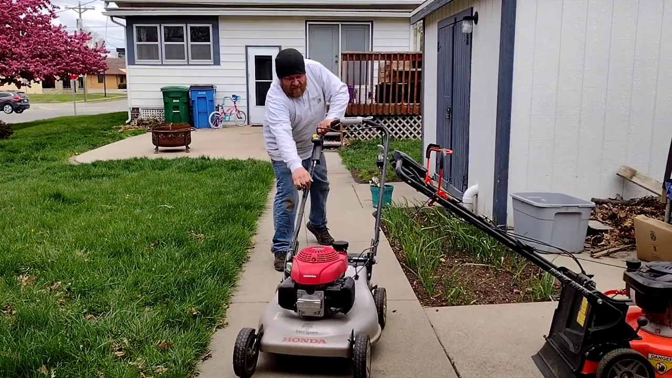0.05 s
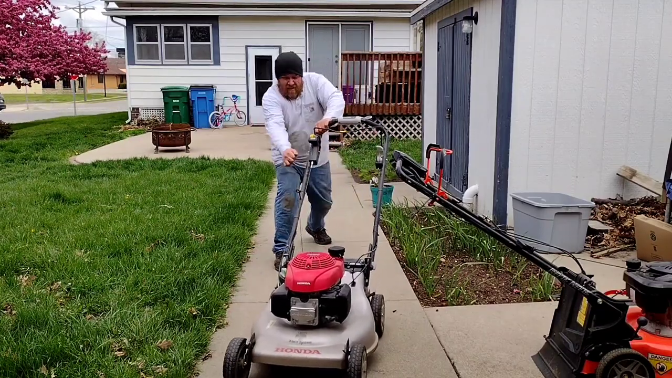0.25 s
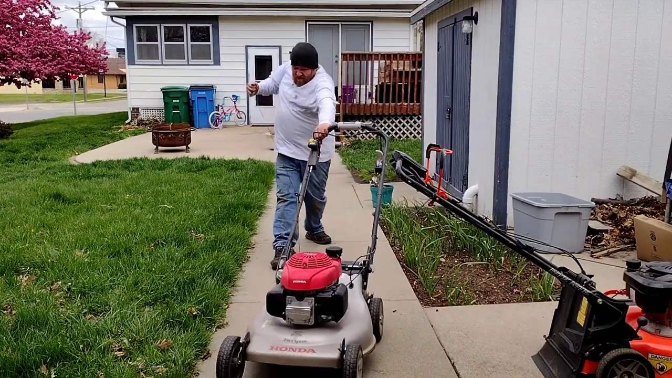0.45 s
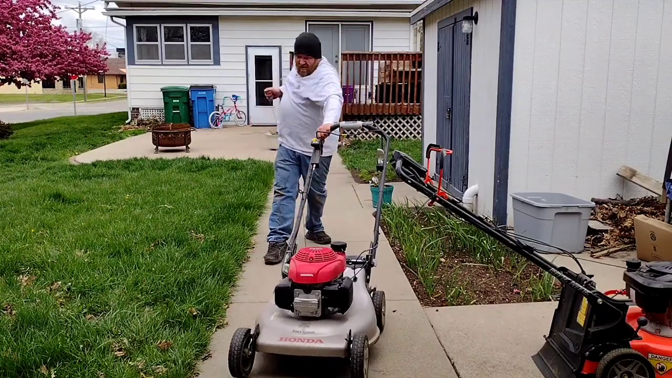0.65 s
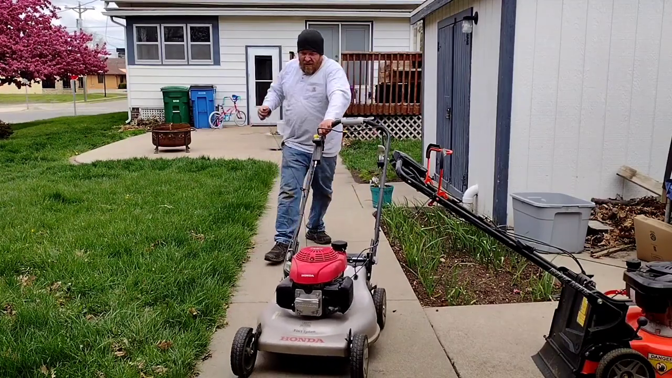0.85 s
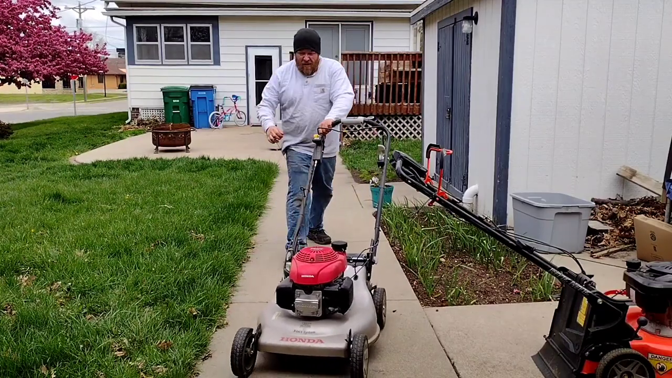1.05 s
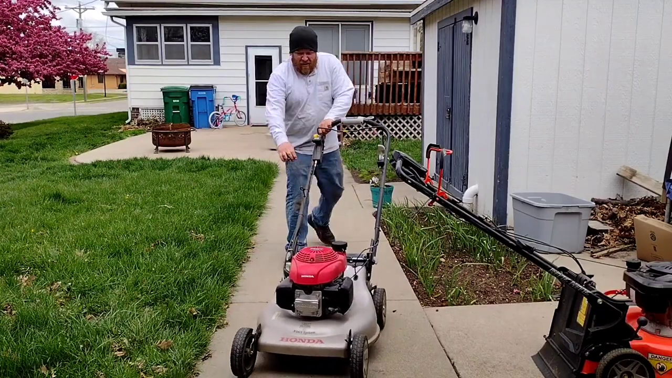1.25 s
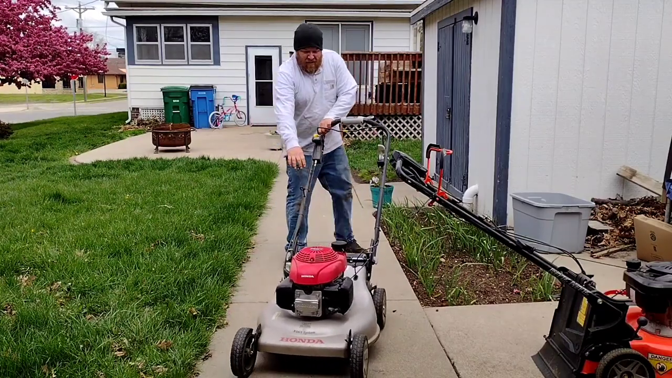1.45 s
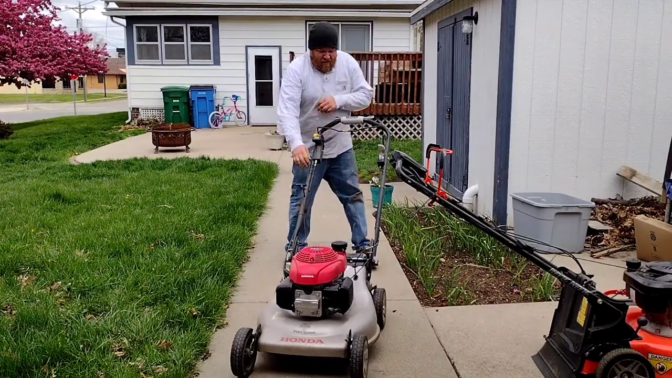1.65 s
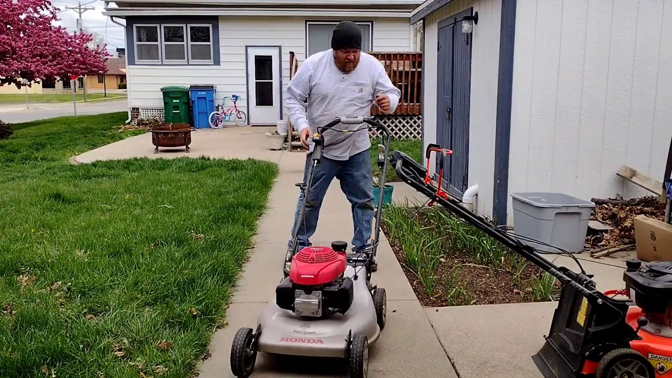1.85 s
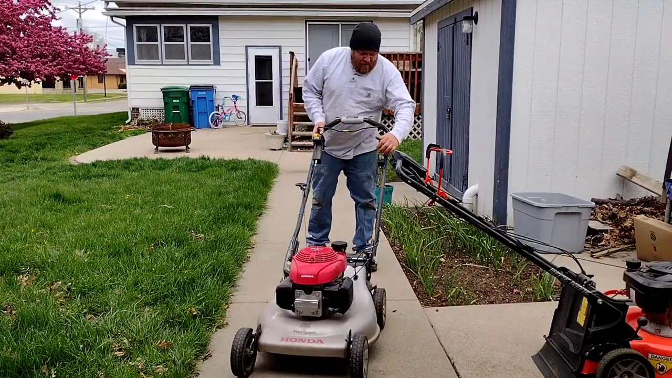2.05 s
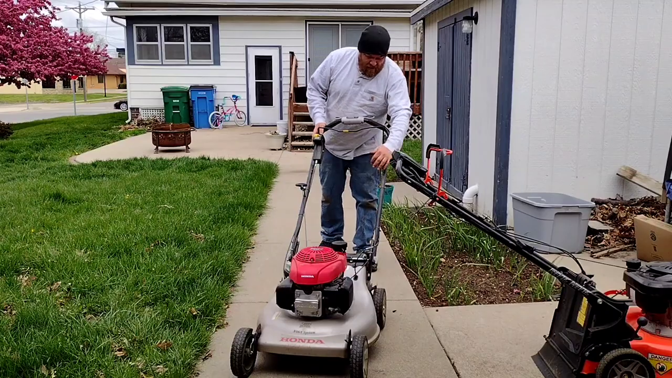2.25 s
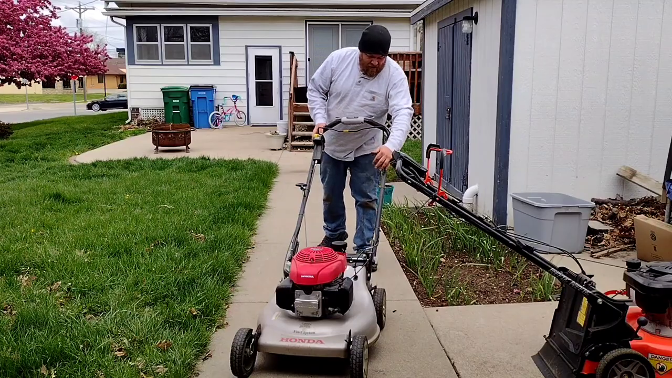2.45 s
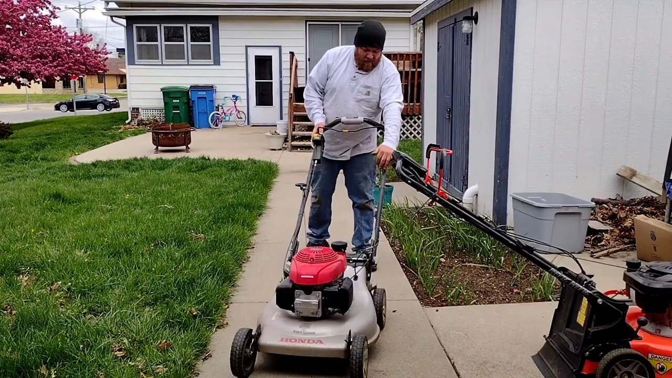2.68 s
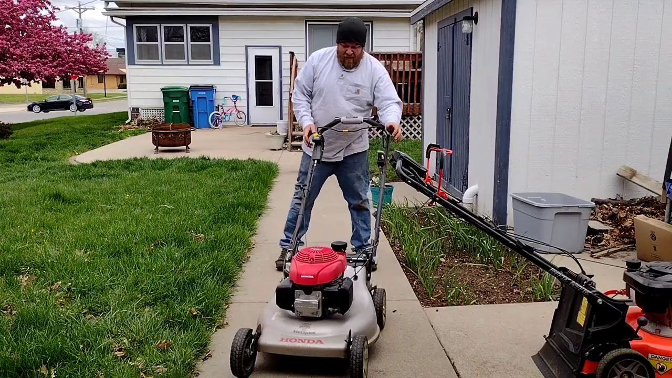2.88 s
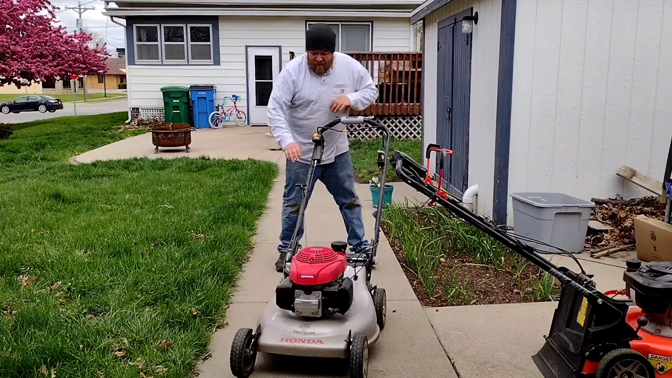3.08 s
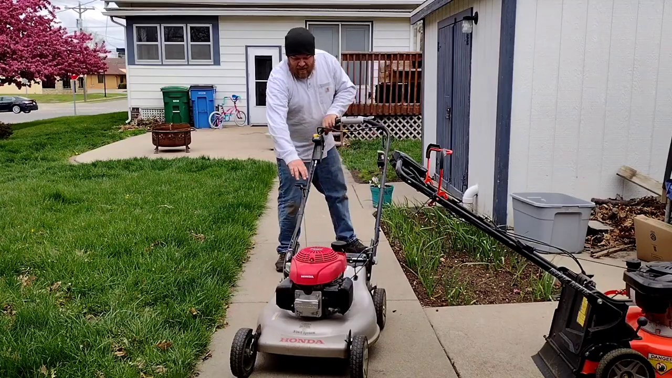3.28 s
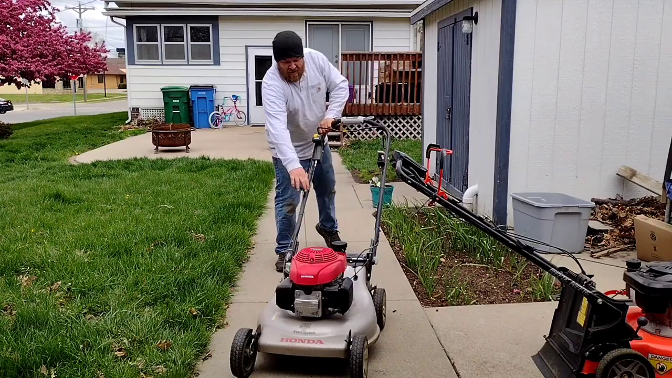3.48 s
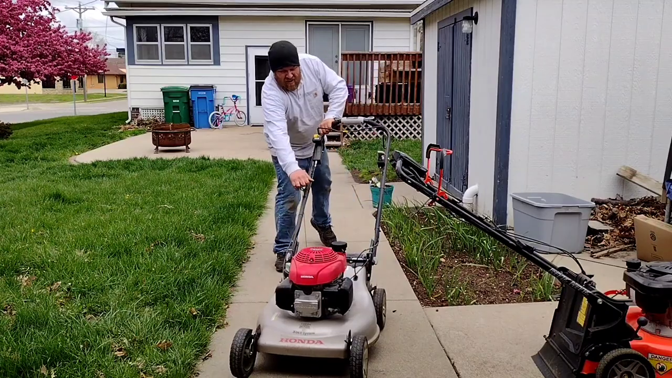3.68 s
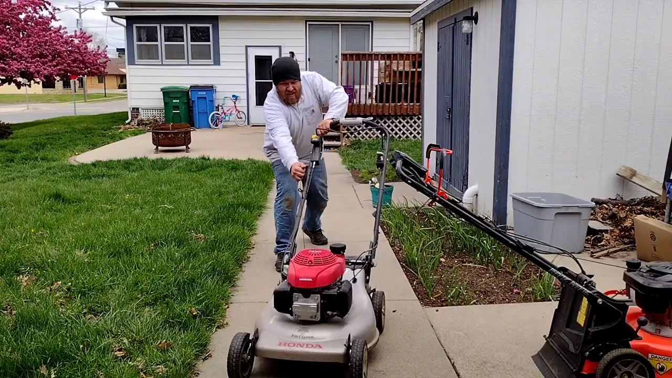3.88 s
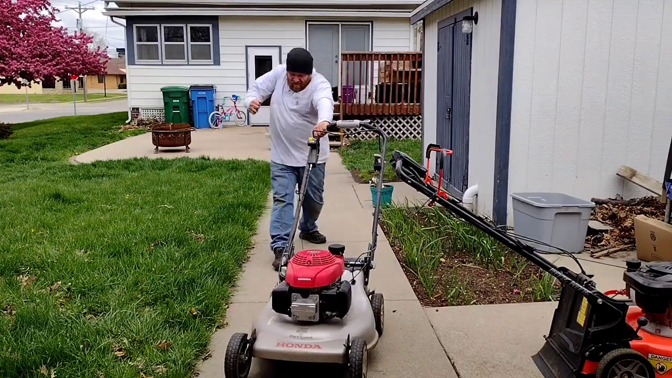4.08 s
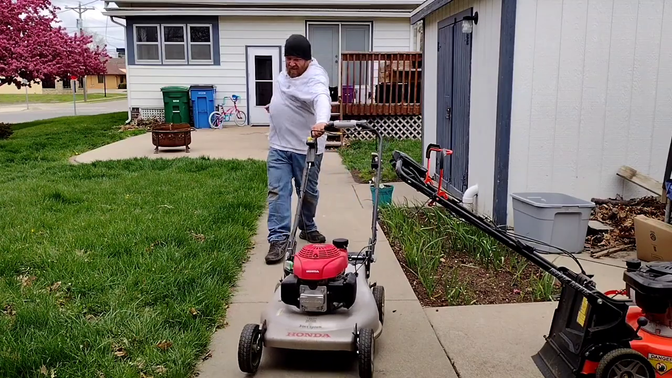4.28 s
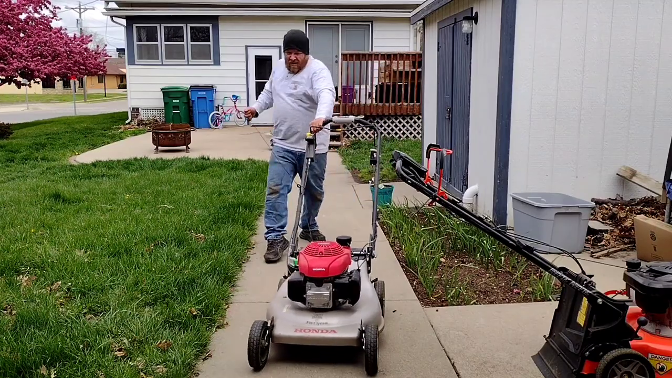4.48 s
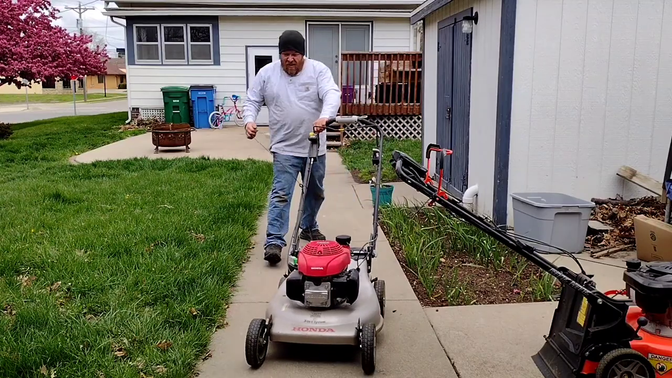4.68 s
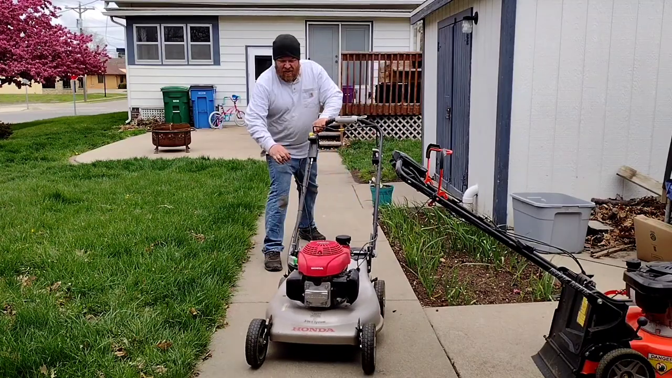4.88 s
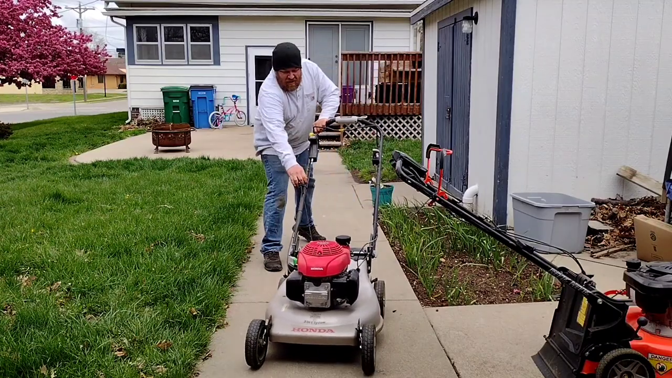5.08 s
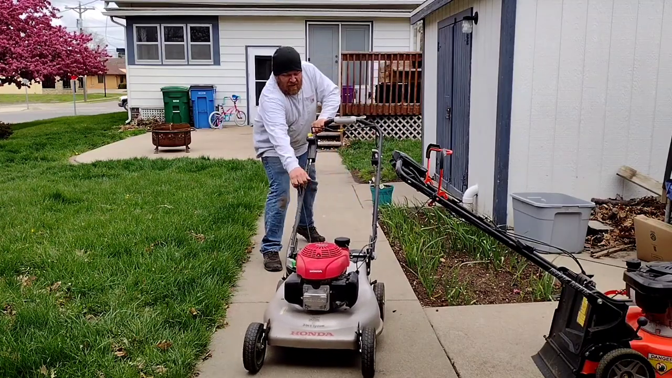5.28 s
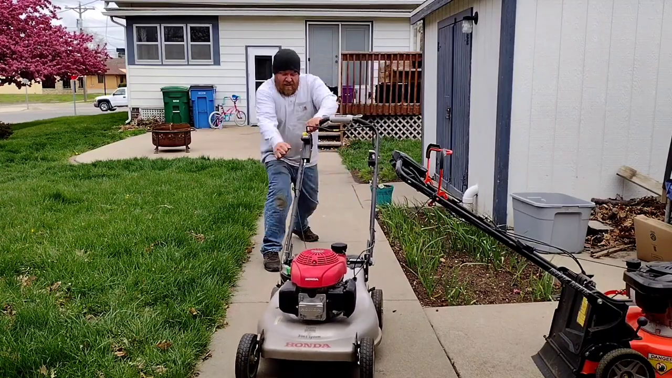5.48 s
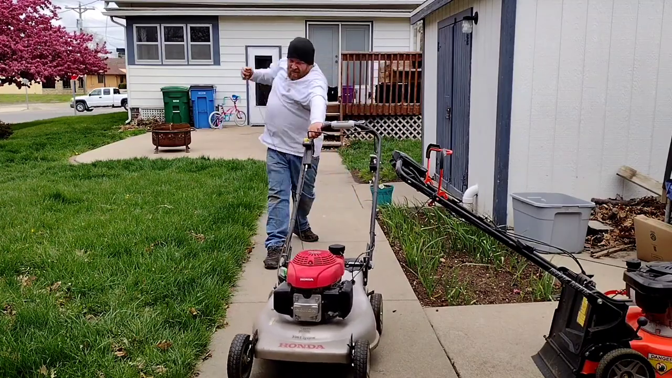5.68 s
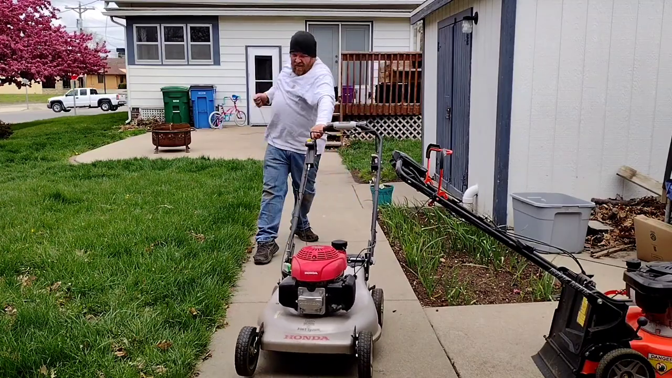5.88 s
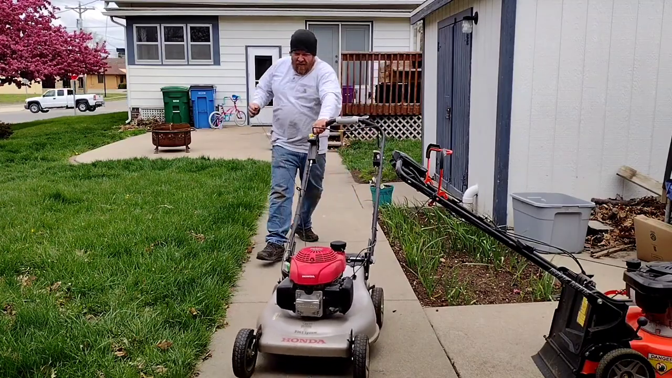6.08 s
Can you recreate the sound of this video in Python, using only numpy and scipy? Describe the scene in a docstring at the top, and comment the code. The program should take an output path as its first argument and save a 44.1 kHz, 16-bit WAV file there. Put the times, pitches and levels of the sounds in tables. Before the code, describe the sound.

A small push mower is heard close up on a concrete path outdoors, with short wall reflections and very faint distant traffic. A handle knock and light ticks open the scene. At 0.25 seconds the starter catches with a metallic clack; the cord zips up in a raspy whine until about 0.57, and the engine chuffs and rattles, booming through the steel deck. Heavy compression thumps at 0.64, 0.83 and 1.13 slow and fade. A bright handle-bar clank rings at 1.6, then it is nearly quiet, with small touches and a faint knock at 2.3. The second pull comes at 3.97, its cord running out near 4.26, with hard knocks at 4.46, 4.68 and 4.78 before coasting down. A tiny squeak and handle knocks come around 5.1 to 5.2. The third pull at 5.48 whines until 5.79 and clatters loudly, still turning at the end, around 6.1 seconds.

```python
"""A push mower on a concrete path is pull-started three times: its engine chuffs over and shakes the steel deck.
Deck, block and bare metal are noise from random impacts, filtered by resonances; valves and pawls clack.
After the first two pulls the engine coasts down; the third is still turning at the end.
The cord whines off its reel as a swept sine, and knocks ring the handle bar as impact noise and damped modes.
Shaped noise gives far traffic; walls return a diffuse echo of the mower."""
import sys
import numpy as np
from scipy import signal
from scipy.fft import rfft, irfft, next_fast_len
from scipy.io import wavfile

SR = 44100
rng = np.random.default_rng(int(sys.argv[2]) if len(sys.argv) > 2 else 0)


def digitize_waveform(pressure):
    """Quantize a signal to 16-bit integers and store it at the path in sys.argv[1].

    Rows of a 2-D input are taken as channels; values are limited to [-1, 1].
    """
    field = np.atleast_2d(pressure).T
    bounded = np.clip(field, -1, 1)
    quanta = np.round(bounded * 32767).astype(np.int16)
    wavfile.write(sys.argv[1], SR, quanta)


N = 270333

# Far road noise. Each row: frequency in Hz, relative spectrum level in dB.
TRAFFIC_SPECTRUM = [(15, -72), (25, -29.5), (97, -7.5), (259, -20), (330, -25), (368, -23), (568, -22),
                    (651, -23), (1120, -26.5), (1430, -30.5), (1880, -33), (15200, -59), (16500, -62)]
# Correlation of the road noise between the ports. Each row: frequency in Hz, left-right likeness from 0, unrelated,
# to 1, the same; lower values count as 0.
TRAFFIC_LIKENESS = [(60, 0.94), (240, 0.91), (950, 0.18), (3770, -0.21), (15000, -0.43)]
TRAFFIC_DB = -59

# Spectral lean of the mower to one side. Each row: frequency in Hz, left minus right in dB.
LEAN = [(60, 0), (180, -1.0), (550, 0), (1650, -0.5), (4970, 4.5), (15000, 1.5)]
# Echo of shed, house and concrete. Each row: band centre in Hz, level before the band filter in dB, t60 in seconds.
ECHO_BANDS = [(58.1, -28, .3), (520, -20.5, 1), (1967, -2.5, 0.2), (7960, -11.5, 0.25)]
LEFT_LEAD_S = .000018

# Knocks on the handle bar. Each row: start in seconds, tube, rod and cable clip levels in dB, rattle t60 in seconds.
BAR_KNOCKS = [(.010, -46, -44, -62, 0.076), (0.253, -43, -46, -43, 0.52), (1.577, -60, -53.5, -55.5, 0.27),
              (1.599, -36.5, -35.5, -35, 0.4), (2.311, -68.5, -61, -56, 0.066),
              (3.974, -43.5, -63, -44.5, 0.57), (5.194, -43, -44, -62, 0.13), (5.226, -41, -49, -63, 0.26),
              (5.483, -44, -34.5, -39, 0.047)]
# Resonances of the bar's tube. Each row: frequency in Hz, width in Hz, relative level in dB.
TUBE_MODES = [(195.2, 17, -6.5), (311.3, 40, -10), (417, 37, -3)]
# Resonances of the bar's rod. Each row: frequency in Hz, width in Hz, relative level in dB.
ROD_MODES = [(1890, 120, -5), (2400, 54, 3), (2506, 150, 0), (2707, 44, 6.5), (2940, 25, -3.5),
             (2910, 40, -6), (3360, 150, -16.5)]
# Resonances of the cable clip. Each row: frequency in Hz, width in Hz, relative level in dB.
CLIP_MODES = [(4450, 250, -1), (4700, 250, 0), (5050, 300, -1), (5400, 300, -1), (5750, 300, -2),
              (7200, 400, -13)]
# Tube, rod and clip struck clean. Each row: frequency in Hz, level against that part's knock in dB, t60 in seconds.
BAR_RING = [(417, 11, 0.28), (2900, 9, .11), (4740, 16, 0.055)]
BAR_RISE_S = .007
SNAP_DB, SNAP_T60_S = 11.5, .06  # a bar knock snaps this far above its clip level

# Starter pulls. Each row: pawls catch in seconds, its nominal peak in dB, its t60 in seconds,
# cord starts to whine in seconds, reel spin-up time in seconds, cord runs out in seconds,
# its nominal peak in dB, its t60 in seconds.
PULLS = [(0.2545, -14, .016, .335, .08, .5726, -6.5, 0.039),
         (3.9742, -18.5, 0.054, 4.045, .062, 4.2625, -10, 0.057),
         (5.4836, -12.5, 0.035, 5.575, 0.063, 5.7855, -7, 0.051)]
# A thin squeak. The row: middle in seconds, half length in seconds (sign immaterial), top in Hz, foot in Hz,
# level in dB.
SQUEAK = (5.088, -0.06, 10099, 6500.5, -70)
WHINE_FROM_HZ, WHINE_TOP_HZ, WHINE_BEND = 2500, 5350, 1.2
WHINE_DB, WHINE_FADE_S = -44.5, .02

# Mower turning over: a table for each pull, and the second for it being only shifted about.
# Each row: time in seconds, deck shake in dB, rasp in dB, air hiss in dB.
SHAKING = [
    [(0, -52.5, -58, -85), (.19, -56.5, -83, -64), (.235, -54, -66, -76), (.27, -42, -64, -53),
     (.33, -40, -54, -53), (.41, -32, -44.5, -50.5), (.55, -28, -44, -46), (.64, -27.5, -43.5, -42),
     (.71, -30.5, -50.5, -45.5), (.786, -30, -56, -61), (.9, -30.5, -54, -59), (1.08, -45, -59.5, -71.5),
     (1.26, -49, -61, -74.5), (1.38, -57.5, -70.5, -82.5), (1.58, -64.5, -70, -78.5)],
    [(1.85, -69.5, -77.5, -84.5), (2.1, -73, -73, -81), (2.5, -69.5, -81, -88)],
    [(3.4, -69.5, -86, -87), (3.82, -65.5, -85.5, -86), (3.95, -56.5, -59, -76), (4.01, -37, -50, -51),
     (4.1, -36.5, -48, -60), (4.14, -32, -49.5, -52), (4.25, -29, -42, -46), (4.34, -28, -44.5, -43),
     (4.46, -27.5, -51, -46), (4.61, -33, -56, -57.5), (4.69, -33, -59, -54.5), (4.81, -35.5, -58, -64),
     (4.97, -44, -59.5, -70), (5.07, -44.5, -63.5, -71), (5.24, -54.5, -66.5, -72.5),
     (5.44, -53.5, -73, -75)],
    [(5.44, -54, -58, -81), (5.49, -36, -47, -50), (5.54, -38, -44, -48.5), (5.61, -34.5, -43.5, -47.5),
     (5.66, -28.5, -45, -45), (5.8, -27.5, -41, -42), (5.87, -24.5, -50.5, -40), (5.97, -29, -51.5, -49),
     (6.02, -34, -56, -59), (6.13, -27, -55, -62)],
]
RATTLE_DB, RATTLE_SHAKE_SHARE, RATTLE_RASP_SHARE = 3, 0.57, .45  # the block follows both shake and rasp
# Resonances of the steel deck. Each row: frequency in Hz, width in Hz, relative level in dB.
DECK_MODES = [(96, 22, -1), (143.4, 13, -0.5), (190, 38, 4), (251, 78, -5), (316, 44, -7), (394, 31, -1.5),
              (502, 6.9, -8), (659, 47, -2.5)]
# Resonances of the engine block. Each row: frequency in Hz, width in Hz, relative level in dB.
BLOCK_MODES = [(795, 65, 4), (970, 55, -5), (1171, 89, 1.5), (1450, 200, -3), (1552, 19, 3),
               (1763, 180, -3), (1936, 52, -2.5), (2350, 160, -7.5), (2490, 150, -14), (2740, 120, -12.5)]
# Spectrum of rubbing metal and air. Each row: frequency in Hz, relative spectrum level in dB.
HISS_SPECTRUM = [(1180, -37), (2000, -2), (2900, 0.5), (3140, -0.5), (4550, -7), (8000, -22), (9210, -20.5),
                 (15100, -27), (16100, -28.5), (16500, -58)]
# Spectrum of sharp metal contacts. Each row: frequency in Hz, relative spectrum level in dB.
TICK_SPECTRUM = [(1180, -46.5), (2000, -9), (2540, 7.5), (2920, 3.5), (6140, -4.5), (7520, -12.5),
                 (8820, -11), (12900, -17), (14200, -12.5), (16100, -33.5), (16500, -38.5)]

# Piston coming up against compression. Each row: time in seconds, nominal tick, sizzle, knock and thud levels in dB,
# deck boom level in dB, hollow knock frequency in Hz, hollow knock level in dB.
COMPRESSIONS = [(0.6376, -32, -45, -36, -22, -19, 1800, -43),
                (.831, -29, -39, -25.5, -17.5, -21, 1930, -18.5),
                (1.1273, -40, -55, -36, -32.5, -45, 743, -44),
                (4.4571, -16.5, -26, -16.5, -16, -25.5, 1724, -23),
                (4.6832, -35, -39, -25.5, -32, -32, 1720, -16),
                (4.7812, -55, -69, -34, -23.5, -33, 910, -26),
                (6.0992, -56, -59, -35, -28, -24.5, 1805, -27)]
# Deck modes under a compression. Each row: frequency in Hz, level against the boom in dB, t60 in seconds.
BOOM_MODES = [(199, -2, .19), (389, 1.1, 0.36)]
# Valves and pawls clattering. Each row: time in seconds, nominal tick, sizzle, knock and thud levels in dB.
CLATTER = [(0.3519, -19.5, -62, -37.5, -45), (.4429, -18, -35, -38.5, -27), (0.463, -19, -38, -41, -46),
           (.5576, -15, -32.5, -42, -22), (.664, -31, -48, -49, -25), (.6889, -18, -44, -48, -21.5),
           (0.7463, -22.5, -57, -35.5, -43), (0.8524, -25, -45, -30.5, -20.5), (1.071, -54, -74, -47, -38),
           (1.1752, -32.5, -78.5, -40, -44), (4.0262, -27, -47, -39.5, -45), (4.169, -23, -37.5, -38, -49),
           (4.1848, -19.5, -41, -45, -33), (4.2895, -17.5, -32, -44, -26), (4.4045, -17, -42, -43, -35),
           (4.4194, -26, -52, -39, -43), (4.477, -25, -36, -40, -20.5), (4.5203, -25, -39, -36, -35),
           (4.5423, -22, -37, -30, -26), (4.5744, -33, -51, -33, -24), (4.733, -28.5, -47, -34.5, -32),
           (5.438, -32.5, -50, -47, -50), (5.449, -26.5, -49, -45, -49), (5.558, -19, -54, -51, -34.5),
           (5.659, -42, -35.5, -44, -32), (5.6875, -19, -33, -29.5, -38), (5.706, -15.5, -35, -45, -34),
           (5.812, -19, -44, -36, -34), (5.83, -19, -40, -32, -19.5), (5.9268, -18.5, -36, -35, -33.5),
           (5.9587, -26, -55, -32.5, -30), (6.021, -49, -44, -38.5, -47), (6.069, -22.5, -43.5, -33, -29)]
# Faint ticks as cord and handle are touched. Each row: time in seconds, nominal peak in dB.
TOUCHES = [(.101, -62), (0.1316, -48), (0.174, -45), (.2146, -40.5), (0.2393, -28.5), (1.2993, -56),
           (1.4224, -51), (2.0492, -57.5), (2.1594, -58), (3.4586, -54), (3.4882, -59), (3.8881, -60),
           (3.919, -46.5), (5.1068, -48.5), (5.31, -50), (5.339, -55), (5.3882, -48), (5.42, -40.5)]
# Modes rung as the cord runs out. Each row: frequency in Hz, level against that peak in dB, t60 in seconds.
RUN_OUT_RING = [(6500, -5, 0.012), (963, -10, .05)]
# Kinds of clack. Each row: sizzle, knock and thud levels against the nominal peak in dB.
CATCH, RUN_OUT = (-17.5, -13.5, -14), (-7, -15.5, -12)
TOUCH, SNAP = (-15.5, -14.5, -12), (-15.5, -11.5, -19.5)
# Nominal clack decays; each layer of a clack scales them.
CLATTER_T60_S, COMPRESSION_T60_S, TOUCH_T60_S = 0.053, 0.05, 0.0549
CLATTER_RISE_S, COMPRESSION_RISE_S = 0.0064, 0.0063
SHARP_RISE_S = .006  # catches, run-outs, touches and snaps
HOLLOW_T60_S = 0.043

CUTOFF_HZ = 16600  # stopband edge of the microphone's top


def from_db(db):
    """Decibel law: the amplitude gain of a level in dB."""
    return 10 ** (np.asarray(db) / 20)


def rms_one(x):
    """Power normalisation: the signal scaled to rms 1."""
    return x / np.sqrt(np.mean(x ** 2) + 1e-20)


def in_time(rows, outside):
    """Linear interpolation: columns of a curve sample by sample, held at a given value outside it."""
    s, *columns = np.transpose(rows)
    return [np.interp(np.arange(N) / SR, s, column, outside, outside) for column in columns]


def at_hz(points, hz):
    """Logarithmic frequency scale: a table interpolated along log frequency."""
    points = np.array(points)
    return np.interp(np.log(hz + 1), np.log(points[:, 0] + 1), points[:, 1])


def colour(x, spectrum):
    """Spectral shaping: noise multiplied by a spectrum in the frequency domain, at rms 1."""
    gain = from_db(at_hz(spectrum, np.fft.rfftfreq(N, 1 / SR)))
    return rms_one(irfft(rfft(x) * gain, N))


def drift(rate_hz):
    """Low-pass random process: two equal poles smooth white noise into slow wandering of rms 1."""
    r = np.exp(-2 * np.pi * rate_hz / SR)
    noise = rng.standard_normal(N + SR)
    settled = signal.lfilter([1], [1, -2 * r, r * r], noise)[SR:]
    return rms_one(settled)


def grains(per_s, spread_db):
    """Shot noise: random small impacts of uneven size and either sign, at rms 1."""
    sizes = from_db(spread_db * np.minimum(rng.exponential(1, N), 4))
    signed = sizes * rng.choice([-1, 1], N)
    return rms_one(signed * (rng.random(N) < per_s / SR))


def body(x, modes, low_hz, high_hz, between_db, patchy_db):
    """Modal superposition: parallel resonances over a broad band; a wandering contact swells and fades each mode."""
    band = signal.butter(3, [low_hz, high_hz], "band", fs=SR, output="sos")

    def through(v, wander):
        out = from_db(between_db) * v
        for hz, width_hz, db in modes:
            r = np.exp(-np.pi * width_hz / SR)
            poles = [1, -2 * r * np.cos(2 * np.pi * hz / SR), r * r]
            zeros = [(1 - r * r) / 2, 0, (r * r - 1) / 2]
            out = out + signal.lfilter(zeros, poles, v * from_db(db + wander()))
        return signal.sosfilt(band, out)

    # the steady impulse response sets unit energy gain
    response = through(signal.unit_impulse(SR // 2) + 1e-18, lambda: 0)
    scale = np.sqrt(np.sum(response ** 2))
    return through(x + 1e-18, lambda: patchy_db * drift(18)) / scale


def traffic():
    """Partial coherence: far road noise, most alike in both ports in the bass, swells gently."""
    hz = np.fft.rfftfreq(N, 1 / SR)
    alike = np.clip(at_hz(TRAFFIC_LIKENESS, hz), 0, 1)
    mid, side = rfft(rng.standard_normal((2, N))) * from_db(at_hz(TRAFFIC_SPECTRUM, hz))
    pair = irfft(np.sqrt(1 + alike) * mid + np.sqrt(1 - alike) * side * [[1], [-1]], N)
    return from_db(TRAFFIC_DB + .8 * drift(1.7)) * rms_one(pair)


def yard(x):
    """Diffuse reflection: direct sound reaches two ports with a lead and lean; walls add a separate tail to each."""
    size = next_fast_len(N + SR // 2)
    hz = np.fft.rfftfreq(size, 1 / SR)
    left = from_db(at_hz(LEAN, hz) / 2) * np.exp(1j * np.pi * hz * LEFT_LEAD_S)
    direct = np.array([left, 1 / left])
    t, tail = np.arange(SR // 2) / SR, 0
    for centre, db, t60 in ECHO_BANDS:
        edges_hz = [centre / 2.2, min(centre * 2.2, .45 * SR)]
        sos = signal.butter(1, edges_hz, "band", fs=SR, output="sos")
        burst = rng.standard_normal((2, SR // 2)) * from_db(-60 * t / t60) * (t > .002)
        unit_burst = burst / np.sqrt(np.sum(burst ** 2) / 2)
        tail = tail + from_db(db) * signal.sosfilt(sos, unit_burst)
    return irfft(rfft(x, size) * (direct + rfft(tail, size)), size)[:, :N]


def turning():
    """Coupled vibration: levels in dB of rumble, rattle, rasp and hiss, near silence outside the stretches."""
    stretches = [in_time(rows, outside=-140) for rows in SHAKING]
    rumble, rasp, hiss = np.max(stretches, axis=0)
    rattle = RATTLE_DB + RATTLE_SHAKE_SHARE * rumble + RATTLE_RASP_SHARE * rasp
    return rumble, rattle, rasp, hiss


def handle_bar():
    """Forced resonance: knocks, a crack then loose rattling, and the engine's shaking ring tube, rod and clip."""
    t, out = np.arange(N) / SR, 0
    rumble_db, rattle_db, rasp_db, _ = turning()
    parts = ((TUBE_MODES, 150, 900, rumble_db - 14),
             (ROD_MODES, 1200, 4000, rattle_db - 18),
             (CLIP_MODES, 3500, 6600, rasp_db - 11.5))
    for k, (modes, low_hz, high_hz, shaken_db) in enumerate(parts):
        power = from_db(2 * shaken_db)
        for s, *levels_db, t60 in BAR_KNOCKS:
            since = np.clip(t - s, 0, None)
            rise = np.minimum(since / BAR_RISE_S, 1)
            crack = from_db(28.0 - 120 * since / 0.022)  # extra power at the onset
            power = power + rise * from_db(2 * levels_db[k] - 120 * since / t60) * (1 + crack)
        drive = grains(5000, 5.9) * np.sqrt(power)
        out = out + body(drive, modes, low_hz, high_hz, between_db=-13.5, patchy_db=5.5)
    return out


def cord():
    """Frequency modulation: a rasping whistle follows the reel's speed, and one squeak arches in pitch."""
    t, voices = np.arange(N) / SR, []
    for start, spin_up, end in (pull[3:6] for pull in PULLS):
        speed = 1 - np.exp(-(np.maximum(t - start, 0) / spin_up) ** WHINE_BEND)
        gate = np.clip(np.minimum(t - start, end - t) / WHINE_FADE_S, 0, 1)
        hz = WHINE_FROM_HZ + (WHINE_TOP_HZ - WHINE_FROM_HZ) * speed
        voices.append((hz, WHINE_DB, gate * speed))
    middle, half, top_hz, foot_hz, squeak_db = SQUEAK
    arch = np.clip(1 - ((t - middle) / half) ** 2, 0, 1)
    voices.append((foot_hz + (top_hz - foot_hz) * arch, squeak_db, arch > 0))
    out = 0
    for hz, db, gate in voices:
        wobble, breakup_db = 1 + .025 * drift(300), 4 * drift(40)
        phase = 2 * np.pi * np.cumsum(hz * wobble) / SR
        out = out + gate * from_db(db + breakup_db) * np.sin(phase)
    return out


def struck_modes():
    """Free vibration: every pitched knock as start in seconds, Hz, nominal peak in dB and t60 in seconds."""
    rows = [(s, hz, levels[k] + db, t60)
            for s, *levels in BAR_KNOCKS for k, (hz, db, t60) in enumerate(BAR_RING)]
    rows += [(pull[5], hz, pull[6] + db, t60) for pull in PULLS for hz, db, t60 in RUN_OUT_RING]
    rows += [(row[0], hz, row[5] + db, t60) for row in COMPRESSIONS for hz, db, t60 in BOOM_MODES]
    return rows + [(row[0], *row[6:], HOLLOW_T60_S) for row in COMPRESSIONS]


def hollow_knocks():
    """Beating: each knock is three close damped modes, brought in over 1.5 ms."""
    out, t = np.zeros(N + SR), np.arange(SR // 4) / SR
    modes = struck_modes()
    detunings = rng.uniform(0.02, 0.04, (len(modes), 2))
    for (s, hz, db, t60), (below, above) in zip(modes, detunings):
        phase = 2 * np.pi * hz * t
        cluster = np.sin(phase * (1 - below)) + np.sin(phase) + .7 * np.sin(phase * (1 + above))
        envelope = from_db(db - 9.0 - 60 * t / t60) * np.minimum(t / 0.0015, 1)
        start = round(s * SR)
        out[start:start + len(t)] += envelope * cluster
    return out[:N]


def clacks():
    """Impact excitation: every clack as s, tick, sizzle, knock and thud dB, nominal t60 s, rise s."""
    snaps = [(row[0] + SHARP_RISE_S, row[3] + SNAP_DB, SNAP_T60_S) for row in BAR_KNOCKS]
    kinds = [(CATCH, [row[:3] for row in PULLS]),
             (RUN_OUT, [row[5:] for row in PULLS]),
             (TOUCH, [(*row, TOUCH_T60_S) for row in TOUCHES]),
             (SNAP, snaps)]
    rows = [(s, db, db + sizzle, db + knock, db + thud, t60, SHARP_RISE_S)
            for (sizzle, knock, thud), hits in kinds for s, db, t60 in hits]
    rows += [(*row, CLATTER_T60_S, CLATTER_RISE_S) for row in CLATTER]
    return rows + [(*row[:5], COMPRESSION_T60_S, COMPRESSION_RISE_S) for row in COMPRESSIONS]


def clack_envelopes(longer, delay_s):
    """Damped decay: each clack swells over a few ms and dies; lower layers come later and last longer."""
    power = np.zeros((4, N + SR))
    t = np.arange(SR // 2) / SR
    for s, tick_db, sizzle_db, knock_db, thud_db, t60, rise in clacks():
        for k, db in enumerate((sizzle_db, tick_db - 11.5, knock_db, thud_db)):
            decay = from_db(-60 * (t - rise) / (t60 * longer[k]))
            shape = np.where(t < rise, (t / rise) ** 1.6, decay)
            start = max(0, round((s - rise + delay_s[k]) * SR))
            power[k, start:start + len(t)] += (from_db(db) * shape) ** 2
    return np.sqrt(power[:, :N])


def blows(column, gain_db):
    """Impulse excitation: the single hard contact at the heart of each clack."""
    out, rows = np.zeros(N), np.array(clacks())
    out[np.round(rows[:, 0] * SR).astype(int)] = from_db(rows[:, column] + gain_db)
    return out


def engine():
    """Source and resonator: shaking and clacks drive the deck (low), block (middle) and metal contacts (high)."""
    rumble_db, rattle_db, rasp_db, hiss_db = turning()
    sizzle, tick, knock, thud = clack_envelopes(longer=[.9, 1.05, 1.4, 2.4], delay_s=[.0005, .0006, .001, .003])
    shake = drift(25)

    deck_level = np.hypot(from_db(rumble_db - 2.03 + 0.38 * shake), thud)
    deck_drive = grains(1500, 1.9) * deck_level + blows(column=4, gain_db=15)
    deck = body(deck_drive, DECK_MODES, 53, 860, between_db=-13.0, patchy_db=3.0)

    block_level = np.hypot(from_db(rattle_db - 5.0 + 1.1 * shake + 0.72 * drift(60)), knock)
    block_drive = grains(4000, 3.1) * block_level + blows(column=3, gain_db=3)
    block = body(block_drive, BLOCK_MODES, 650, 2600, between_db=-4.0, patchy_db=4.5)

    rubbing = colour(grains(5000, 4.7), HISS_SPECTRUM)
    contacts = colour(grains(12000, 1.0), TICK_SPECTRUM)
    flutter_db = 0.59 * shake + 0.45 * drift(70)
    metal = 0
    for kind, level_db, clack in (("low", rasp_db, tick), ("high", hiss_db, sizzle)):
        sos = signal.butter(4, 7000, kind, fs=SR, output="sos")
        metal = metal + rms_one(signal.sosfilt(sos, rubbing)) * from_db(level_db + flutter_db)
        metal = metal + rms_one(signal.sosfilt(sos, contacts)) * clack
    return deck + block + metal


def scene():
    """Superposition: the mower in the yard is added to the traffic."""
    mower = engine() + hollow_knocks() + cord() + handle_bar()
    return yard(mower) + traffic()


def record(dry):
    """Band limiting and saturation: the microphone drops deepest bass, rounds peaks and cuts the top steeply."""
    thinned = signal.sosfilt(signal.butter(2, 55, "high", fs=SR, output="sos"), dry)
    rounded = .95 * np.tanh(thinned / .95)
    return signal.sosfilt(signal.cheby2(14, 70, CUTOFF_HZ, fs=SR, output="sos"), rounded)


dry = scene()
out = record(dry)
digitize_waveform(out)
```